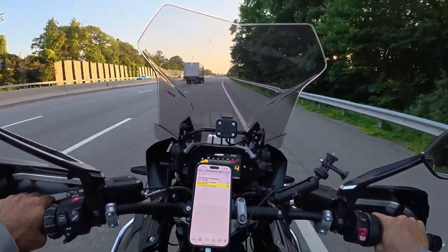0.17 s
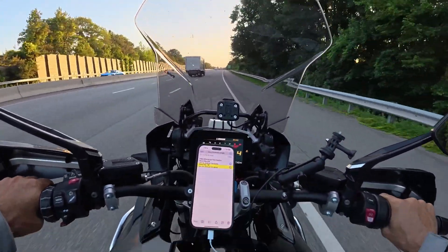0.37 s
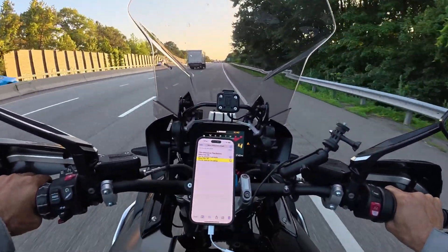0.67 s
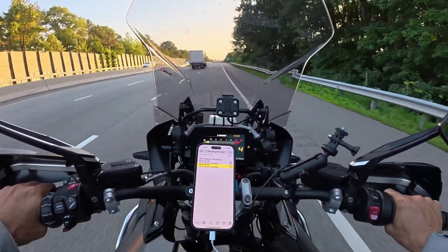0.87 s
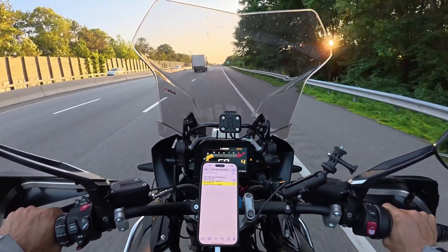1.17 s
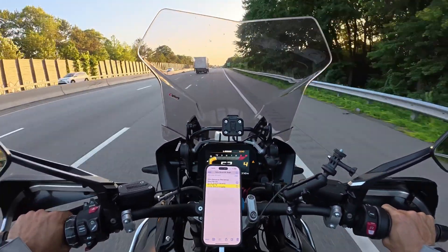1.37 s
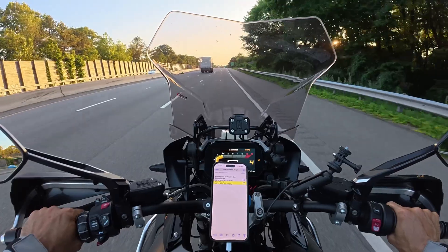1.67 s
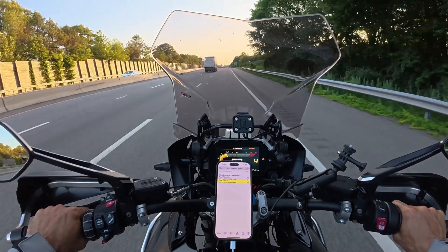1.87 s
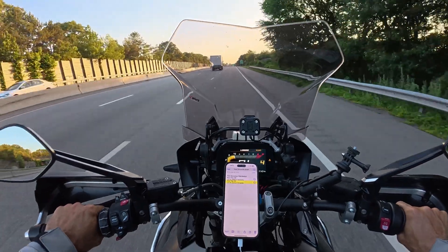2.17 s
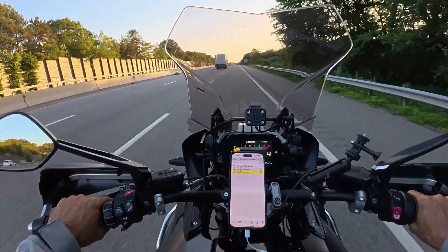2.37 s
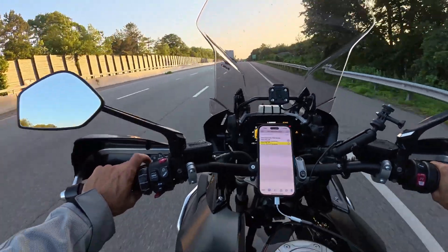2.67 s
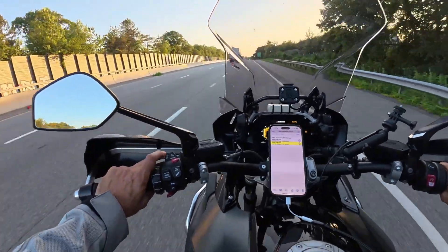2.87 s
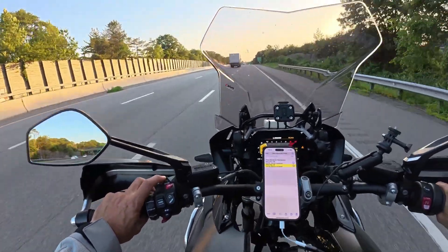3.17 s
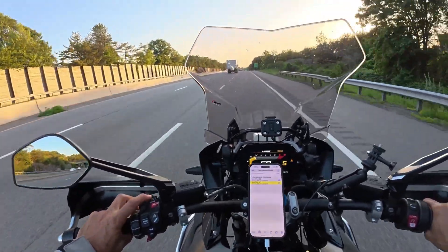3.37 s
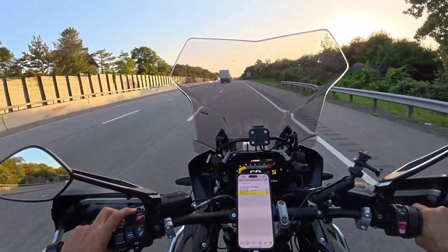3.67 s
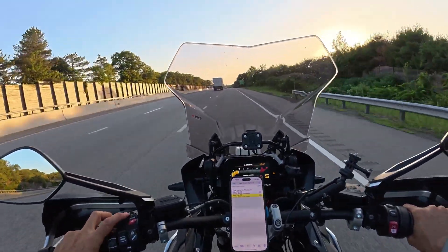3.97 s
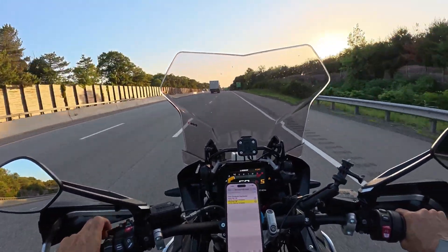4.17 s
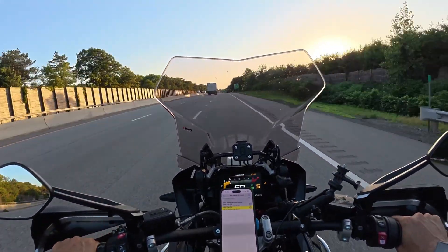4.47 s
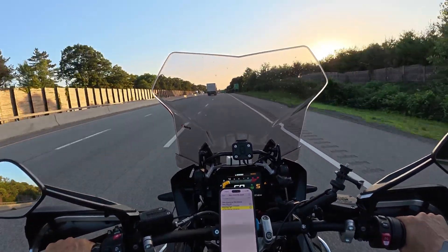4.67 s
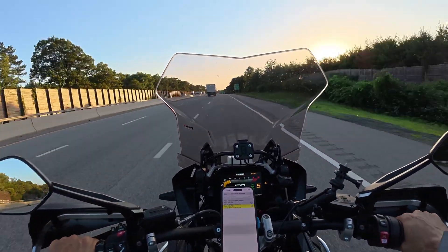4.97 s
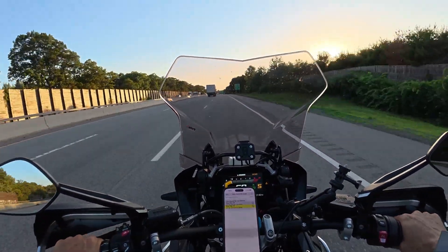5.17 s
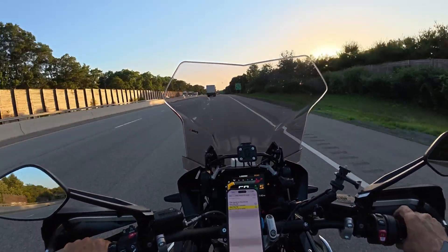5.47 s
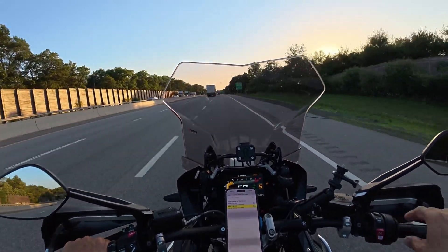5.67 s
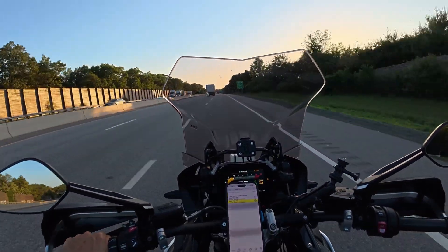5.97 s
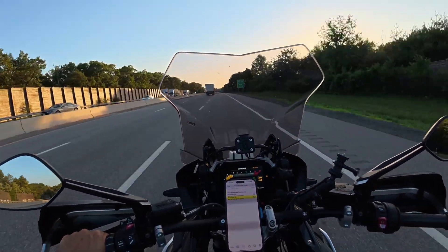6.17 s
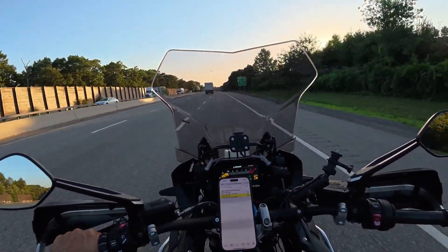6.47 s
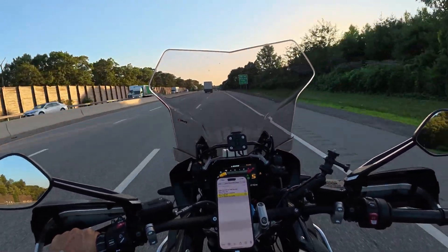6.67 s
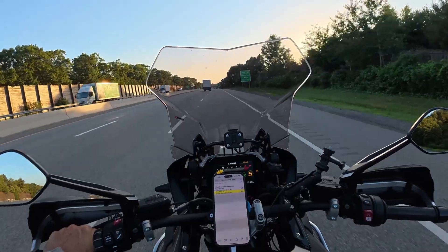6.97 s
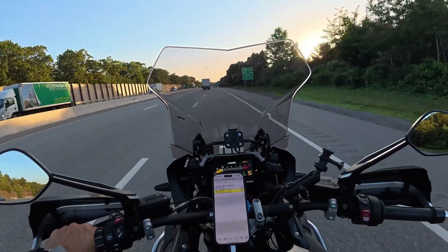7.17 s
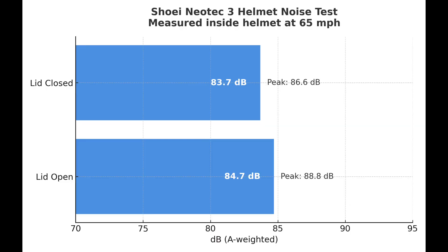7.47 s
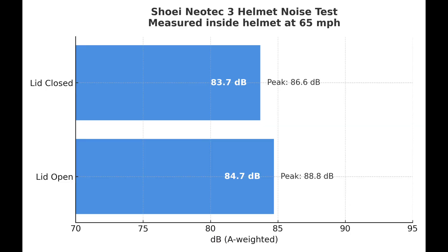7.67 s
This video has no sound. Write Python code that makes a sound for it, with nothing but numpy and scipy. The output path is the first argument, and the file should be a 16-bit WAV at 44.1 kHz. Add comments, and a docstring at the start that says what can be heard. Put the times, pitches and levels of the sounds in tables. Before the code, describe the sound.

Motorcycle engine drones and booms behind a windscreen on a highway, dipping at gear changes, gusts thumping the microphone, slowly fading to silence.

```python
"""On the road behind a motorcycle's screen: a twin pulls through two upshifts and settles at cruising speed.
The exhaust, drone and their boom are cosines on orders of the firing rate; wind is shaped, flickering noise.
Loose parts are noise-struck resonances; valve chirps and panel pings are short decaying sines.
Now and then a gust pins the microphone at a flat value; the sound fades out to silence."""
import sys
import numpy as np
from scipy import signal
from scipy.fft import rfft, irfft
from scipy.io import wavfile

SR = 44100
rng = np.random.default_rng(int(sys.argv[2]) if len(sys.argv) > 2 else 0)


def gain_from_db(level_db):
    """Turn a decibel level (scalar or array-like) into a linear amplitude factor."""
    decades = np.asarray(level_db, float) / 20
    return 10 ** decades


def transcribe(signal):
    """Save signal, clipped to [-1, 1], as a 16-bit WAV file at the path in sys.argv[1]."""
    frames = np.atleast_2d(signal).T
    limited = np.clip(frames, -1, 1)
    pcm = np.round(limited * 32767).astype(np.int16)
    wavfile.write(sys.argv[1], SR, pcm)


N = 344421

# microphone pinned by a gust: (start [s], length [s], held value before the low cut [1 = full scale])
PINNED_SPELLS = [(1.9165, .009, -.35), (1.9525, .004, .3), (1.9645, .005, .5), (2.0765, .002, .1),
                 (3.173, .002, .1), (3.9045, .002, .1), (3.9175, .012, -.12), (4.181, .004, .1),
                 (5.2035, .0055, -.11), (5.222, .0125, -.22), (6.0602, .0165, .19), (6.0948, .015, .33),
                 (6.2645, .011, .11)]


def rms_one(x):
    """Scale to unit rms."""
    return x / np.sqrt(np.mean(x ** 2) + 1e-20)


def in_time(rows):
    """Table columns as curves over time, one value per sample."""
    s, *columns = np.transpose(rows)
    return [np.interp(np.arange(N) / SR, s, column) for column in columns]


def drift(rate):
    """Slow random wander of rms about 1: noise through two equal low-pass poles at rate [Hz]."""
    pole = np.exp(-80 * np.pi * rate / SR)  # run at one value per 40 samples
    noise = rng.standard_normal(N // 40 + 2002)
    slow = signal.lfilter([1], [1, -2 * pole, pole * pole], noise)[2000:]
    return np.interp(np.arange(N) / 40, np.arange(len(slow)), rms_one(slow))


def coloured(spectrum, patchy_db, rate):
    """Noise shaped by a spectrum, split into overlapping octaves that each flicker; rms 1."""
    hz = np.fft.rfftfreq(N, 1 / SR) + 1
    points = np.array(spectrum)
    shape = gain_from_db(np.interp(np.log(hz), np.log(points[:, 0]), points[:, 1], -120, -120))
    bins = rfft(rng.standard_normal(N)) * shape
    out = 0
    lowest, highest = int(np.log2(points[0, 0])), int(np.log2(points[-1, 0])) + 1
    for octave in range(lowest, highest + 1):
        share = np.clip(1 - np.abs(np.log2(hz) - octave), 0, 1)
        out = out + irfft(bins * share, N) * gain_from_db(patchy_db * drift(rate))
    return rms_one(out)


def orders(fired, multiples, levels_db, waver_db, wander):
    """Cosines on multiples of the firing rate, nearly in step so that they add to pulses; each wavers a little."""
    out = 0
    for multiple, db in zip(multiples, levels_db):
        level = np.sqrt(2) * gain_from_db(db + waver_db * drift(2.9))
        cycles = multiple * fired + wander * drift(5.9)
        out = out + level * np.cos(2 * np.pi * cycles)
    return out


def firings(fired, start, length, count):
    """Seconds from start of every count-th firing within length, 40 at most."""
    t = np.arange(N) / SR
    wanted = np.interp(start, t, fired) + count * np.arange(40)
    since = np.interp(wanted, fired, t) - start
    return since[since < length]


def add_ring(out, s, db, hz, t60, phase):
    """Mix in a short decaying sine that sags a little in pitch, after a 2 ms rise."""
    at, since = round(s * SR), np.arange(SR // 12) / SR
    shape = np.minimum(since / .002, 1) * gain_from_db(-60 * since / t60)
    cycles = hz * since * (1 - 0.41 * since)
    out[at:at + len(since)] += gain_from_db(db) * shape * np.sin(2 * np.pi * (cycles + phase))


def exhaust(fired):
    """Firing pulses leave the pipe as low orders, a resonant fourth, load-driven upper orders and a snarl."""
    # low orders: (multiple of firing rate), and (level [dB]) of each
    low_orders = [1, 1.5, 2, 3]
    low_levels = [0.5, -22.5, 1, -2]
    # strength of the low orders together: (time [s], level [dB])
    thud = [(0, -23), (.12, -22), (.2, -26.5), (.3, -22), (.44, -27.5), (.62, -24), (1.1, -30.5),
            (1.88, -25.5), (2.15, -27.5), (2.3, -25), (3.0, -24), (4.15, -30.5), (5.0, -30.5), (7.3, -30.5)]
    # how hard the pipe booms on the fourth order: (time [s], level [dB])
    boom_strength = [(0, -24), (.12, -19.5), (.17, -29.5), (.24, -22), (.285, -27), (.325, -13),
                     (.52, -10.5), (.58, -21), (.64, -17.5), (.85, -13), (1.4, -14), (1.75, -15.5),
                     (1.88, -19.5), (1.95, -27), (2.03, -22), (2.13, -22.5), (2.18, -14.5), (2.22, -29.5),
                     (2.26, -15), (2.32, -23.5), (2.7, -23.5), (3.5, -19.5), (4.15, -22.5), (4.42, -27),
                     (4.52, -33), (5.0, -36), (5.5, -33), (7.3, -34.5)]
    # upper orders: (multiple of firing rate), and (level [dB]) of each
    upper_orders = [5, 6, 7, 8, 9, 10, 11, 12, 13, 15, 16]
    upper_levels = [1, -12, 0, -9, -23, -13, -17.5, -8, -15, -17.5, -12.5]
    # throttle: (time [s], load [0-1])
    load = [(0, 0.1), (.12, 0.1), (.2, 0.56), (.3, .65), (.36, 0.4), (.5, .55), (.64, 0.94), (.9, 0.82),
            (1.75, 0.87), (1.95, 0.3), (2.04, 0.65), (2.13, 0.7), (2.32, 1), (3.5, 0.85), (4.15, 0.61),
            (4.5, .02), (5.0, 0.3), (7.3, 0)]
    # snarl: (multiple of firing rate), and (level [dB]) of each
    snarl_orders = [10, 10.5, 11]
    snarl_levels = [3.5, -6.5, -10]
    # pipe resonance met near the top of a gear: (time [s], level [dB])
    snarl_strength = [(1.25, -55), (1.45, -34.5), (1.85, -36), (2.0, -60)]

    low = gain_from_db(in_time(thud)[0]) * orders(fired, low_orders, low_levels, waver_db=0.5, wander=0.036)
    boom = gain_from_db(in_time(boom_strength)[0]) * orders(4 * fired, [1], [0], waver_db=.7, wander=.02)
    upper_db = -49 + 22 * in_time(load)[0]  # shut throttle, plus what full load adds
    upper = gain_from_db(upper_db) * orders(fired, upper_orders, upper_levels, waver_db=1.0, wander=0.18)
    snarl = orders(fired, snarl_orders, snarl_levels, waver_db=2.0, wander=0.043)
    return low + boom + upper + gain_from_db(in_time(snarl_strength)[0]) * snarl


def wind(fired, roar_db, hiss_over_db):
    """Turbulent hiss and roar throb slightly with the firing; low lumps of air hit the microphone."""
    # air hiss, roar and lumps, each: (frequency [Hz], relative density [dB per Hz])
    hiss_spectrum = [(710, -23), (1200, -1.5), (1550, -5), (1950, -8.5), (2470, -6), (3060, -11.5),
                     (3750, -11.5), (4400, -14), (5230, -15.5), (6480, -18), (8950, -29.5), (12600, -38),
                     (15600, -42)]
    roar_spectrum = [(160, -30), (280, -5), (413, -5), (454, -1.5), (538, -3.5), (702, -3), (759, -7),
                     (929, -5), (1800, -27.5), (2340, -51), (3960, -120)]
    lump_spectrum = [(35, -35), (50, 4.5), (80, 3.5), (150, 1.5), (220, -1.5), (330, -15.5), (450, -32)]
    # lumps of wind on the microphone: (time [s], peak level [dB])
    gusts = [(0, -22), (.2, -17.5), (.32, -27), (1.6, -21), (1.8, -23), (1.87, -17), (1.92, -13),
             (1.972, -7.5), (2.1, -11.5), (2.28, -18.5), (2.72, -22), (2.81, -15.5), (3.19, -15.5),
             (3.5, -19), (3.62, -16.5), (3.89, -17), (4.0, -23), (4.2, -17.5), (4.51, -21), (4.65, -19.5),
             (4.85, -20.5), (4.72, -23.5), (5.06, -25), (5.14, -18), (5.21, -17), (5.48, -19), (5.66, -18),
             (5.9, -22), (6.08, -12), (6.21, -16)]
    rise_db_per_s, fall_db_per_s, calm_db = 298, 348, -31
    sink_db_per_ms, sink_before_s, sink_after_s, roar_share = 0.16, 0.062, 0.14, 0.52

    t = np.arange(N) / SR
    throb = np.cos(2 * np.pi * fired)
    # the rush sinks around each pinning gust, the deeper the longer it pins
    sink_db = 0
    for s, length, _ in PINNED_SPELLS:
        dip = np.interp(t - s, [-sink_before_s, 0, sink_after_s], [0, 1, 0])
        sink_db = sink_db + sink_db_per_ms * 1000 * length * dip
    hiss_db = roar_db + hiss_over_db - sink_db + 0.63 * throb
    hiss = gain_from_db(hiss_db) * coloured(hiss_spectrum, patchy_db=1.2, rate=30)
    sunk_roar_db = roar_db - roar_share * sink_db + 0.21 * throb
    roar = gain_from_db(sunk_roar_db) * coloured(roar_spectrum, patchy_db=0.76, rate=14)
    gust_db = np.full(N, float(calm_db))
    for s, db in gusts:
        slope_db = np.minimum(rise_db_per_s * (t - s), fall_db_per_s * (s - t))
        gust_db = np.maximum(gust_db, db + slope_db)
    return hiss + roar + gain_from_db(gust_db) * coloured(lump_spectrum, patchy_db=1.5, rate=6)


def drone(fired, roar_db):
    """Thin gear and tyre tones tied to engine speed, riding on the level of the wind's roar."""
    # tones: (multiple of firing rate), and (level over the roar [dB]) of each
    drone_orders = [3.75, 7.238, 10.857, 54, 61, 126]
    drone_levels = [-5, -8, -7.5, -25, -34.5, -48]
    # swell of all tones together: (time [s], level [dB])
    drone_swell = [(2.3, -2.5), (3.4, -14), (4.2, -2.5), (4.6, -1.5), (5.4, -1.5), (6.2, -1.5), (7.3, -2.5)]
    tones = orders(fired, drone_orders, drone_levels, waver_db=1.2, wander=.08)
    return gain_from_db(roar_db + in_time(drone_swell)[0]) * tones


def shaken(fired, hz, ring_s):
    """Each firing shakes a mode with a burst of noise, uneven and unlike for the two cylinders; rms 1."""
    firing = np.floor(fired).astype(int)
    luck_db = 2 * rng.standard_normal(firing[-1] + 1)[firing]
    strength = gain_from_db(luck_db + 2 * (firing % 2))
    out = strength * np.exp(-(fired - firing) / 0.45) * rng.standard_normal(N)
    pole, w = gain_from_db(-120 / (ring_s * SR)), 2 * np.pi * hz / SR
    for _ in range(2):  # steep skirts keep the ring out of far bands
        out = signal.lfilter([1, 0, -1], [1, -2 * pole * np.cos(w), pole * pole], out)
    return rms_one(out)


def rattles(fired):
    """Loose parts ring in their own modes as the firing shakes them, each over its own stretch of time."""
    # rattling parts: (start [s], end [s], mode [Hz], 120 dB decay of each filter pass [s], level [dB])
    rattling_parts = [(-.1, .34, 717, 0.077, -26), (-.1, 0.373, 520, 0.093, -29.5),
                      (0.097, 0.335, 569, 0.047, -27), (-.1, 0.324, 985, 0.045, -48),
                      (.1, 0.503, 2520, 0.014, -45.5), (0.298, .9, 3390, 0.019, -44.5),
                      (.6, 2.198, 3700, 0.013, -48), (1.0, 2.0, 2480, 0.017, -52.5),
                      (1.4, 1.948, 6120, 0.016, -54), (2.4, 3.15, 1555, 0.092, -42.5),
                      (2.5, 3.3, 5120, .012, -51), (2.6, 3.1, 3250, 0.015, -46.5),
                      (3.2, 3.901, 3650, 0.022, -49.5)]
    t, out = np.arange(N) / SR, np.zeros(N)
    for start, end, hz, ring_s, db in rattling_parts:
        presence = np.clip(np.minimum(t - start, end - t) / 0.078, 0, 1)
        out += gain_from_db(db) * presence * shaken(fired, hz, ring_s)
    return out


def valve_chirps(fired):
    """Valve gear ticks with each firing around the shifts; a run starts brightest and highest."""
    # runs: (start [s], length [s], settled level [dB], level change [dB per s], first pitch [Hz])
    chirp_runs = [(.1506, .025, -28, 0, 3440), (.2813, .62, -27, -6, 3420), (2.2614, .025, -28.5, 0, 3500),
                  (2.342, .045, -32, 60, 3500)]
    fresh_db, fresh_s, sag_hz = 6.5, .045, 70
    scatter_db, scatter_hz = 2.6, 45
    weak_db_per_s = -33  # the second cylinder's chirp dies away sooner

    out = np.zeros(N)
    for start, length, db, change, hz in chirp_runs:
        luck = rng.standard_normal((40, 3))
        for k, since in enumerate(firings(fired, start, length, count=1)):
            fresh = np.exp(-since / fresh_s)
            slope = change + weak_db_per_s * (k % 2)
            level_db = db + fresh_db * fresh + slope * since + scatter_db * luck[k, 0]
            pitch = hz - sag_hz * (1 - fresh) + scatter_hz * luck[k, 1]
            add_ring(out, start + since, level_db, pitch, t60=.032, phase=luck[k, 2])
    return out


def panel_pings(fired):
    """A loose panel rings on every fourth firing, at slightly uneven levels."""
    # runs: (start [s], length [s], first level [dB], level change [dB per s])
    ping_runs = [(2.4428, .68, -34.5, 7)]
    out = np.zeros(N)
    for start, length, db, change in ping_runs:
        luck = rng.standard_normal((40, 2))
        for k, since in enumerate(firings(fired, start, length, count=4)):
            level_db = db + change * since + 1.5 * luck[k, 0]
            add_ring(out, start + since, level_db, hz=1555, t60=0.094, phase=luck[k, 1])
    return out


def scene():
    """Engine, loose parts, drone and wind at one microphone, all following one count of firings."""
    # engine speed through two upshifts, then cruising: (time [s], firing rate [Hz])
    firing_rate = [(0, 69.7), (.12, 62), (.2, 56.7), (.6, 58.2), (1.57, 63.3), (2.0, 65.8), (2.1, 65.6),
                   (2.18, 62.6), (2.29, 58.7), (2.4, 59.4), (2.9, 60.8), (3.41, 62.4), (3.78, 63.4),
                   (4.15, 63.95), (4.45, 64.15), (5.3, 63.7), (7.3, 63.6)]
    # air past the screen: (time [s], roar level [dB], hiss over roar [dB])
    wind_levels = [(0, -22, -8.5), (.16, -20.5, -9.5), (.22, -22, -9.5), (.3, -20, -8.5), (.38, -25, -9.5),
                   (.53, -26.5, -10), (.67, -25, -7.5), (1.09, -29.5, -7), (1.72, -24.5, -12),
                   (1.9, -22, -12), (2.05, -26.5, -9.5), (2.2, -23, -11.5), (2.25, -24.5, -7.5),
                   (2.31, -24.5, -9.5), (2.59, -24.5, -8), (3.28, -27, -7), (3.86, -26, -9.5),
                   (4.25, -25, -10), (4.69, -24.5, -10.5), (5.06, -25, -8.5), (5.3, -26, -10),
                   (6.03, -26, -9), (6.6, -26, -10), (7.3, -25, -11.5)]
    fired = np.cumsum(in_time(firing_rate)[0]) / SR
    roar_db, hiss_over_db = in_time(wind_levels)
    engine = exhaust(fired) + rattles(fired) + valve_chirps(fired) + panel_pings(fired)
    mix = engine + wind(fired, roar_db, hiss_over_db) + drone(fired, roar_db)
    return mix[None]


def low_pass(x):
    """Removes everything above the highest recorded frequency."""
    return signal.sosfilt(signal.butter(12, 15800, fs=SR, output="sos"), x)


def record(dry):
    """A pinned microphone holds a flat value; the low cut after it lets that value ring down; the end fades out."""
    low_cut_hz, high_stop_hz = 78.6, 16250
    fade_from_s, silent_s = 4.6, 7.258
    t, x = np.arange(N) / SR, dry
    for s, length, value in PINNED_SPELLS:
        held = np.clip(np.minimum(t - s, s + length - t) / 0.0018 + .5, 0, 1)
        held = held * held * (3 - 2 * held)  # rounded edges
        x = x * (1 - held) + value * held
    x = signal.sosfilt(signal.butter(3, low_cut_hz, "high", fs=SR, output="sos"), x)
    x = signal.sosfilt(signal.cheby2(12, 70, high_stop_hz, fs=SR, output="sos"), x)
    fade = np.clip((silent_s - t) / (silent_s - fade_from_s), 0, 1) ** 0.86  # nearly straight
    x = x * fade * np.clip(t / .002, 0, 1)  # and a 2 ms fade-in
    return low_pass(x)


dry = scene()
out = record(dry)
transcribe(out)
```